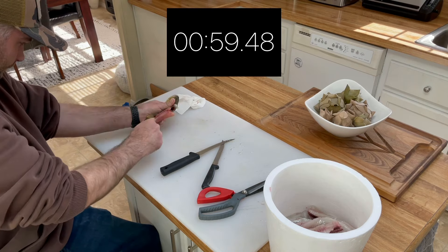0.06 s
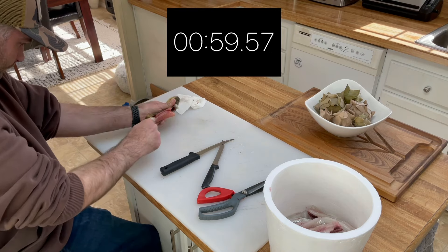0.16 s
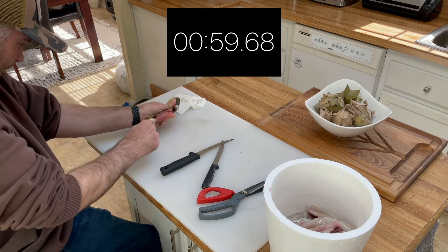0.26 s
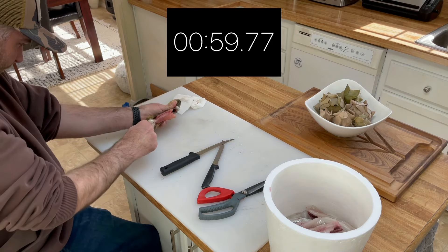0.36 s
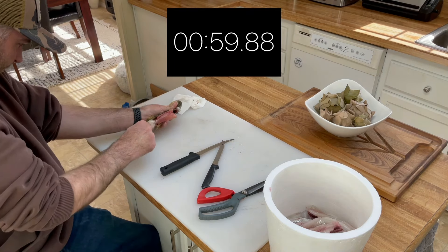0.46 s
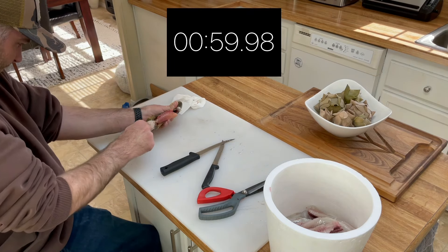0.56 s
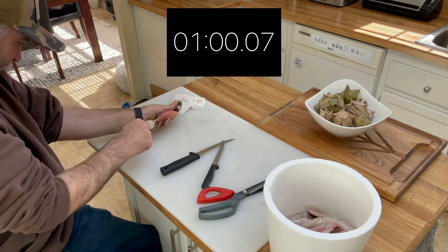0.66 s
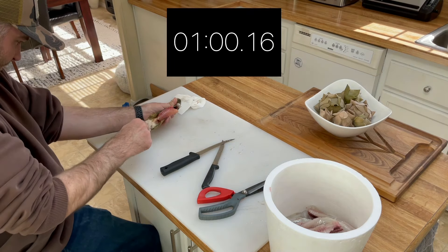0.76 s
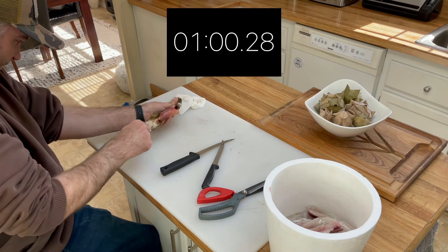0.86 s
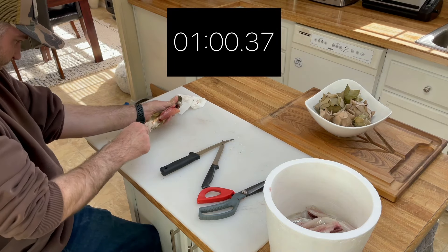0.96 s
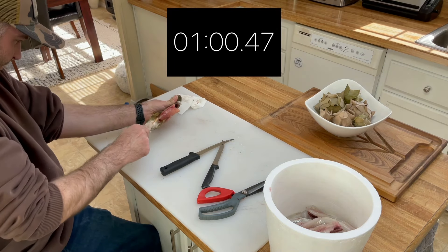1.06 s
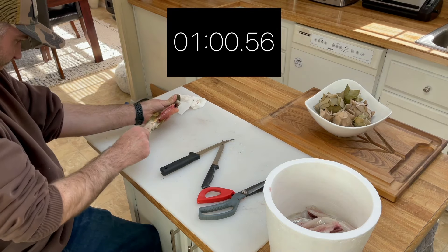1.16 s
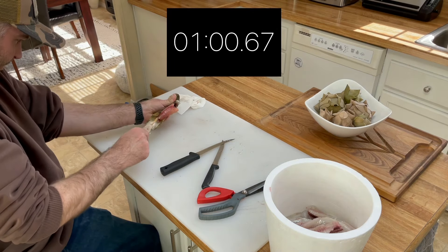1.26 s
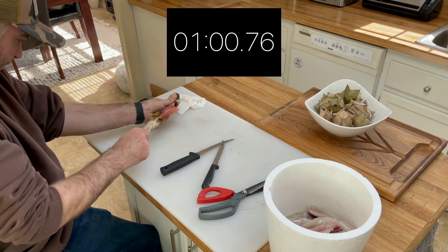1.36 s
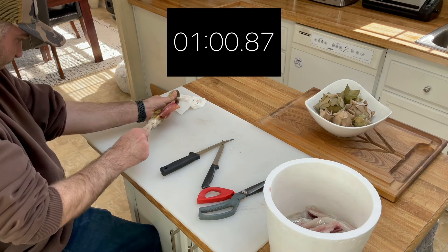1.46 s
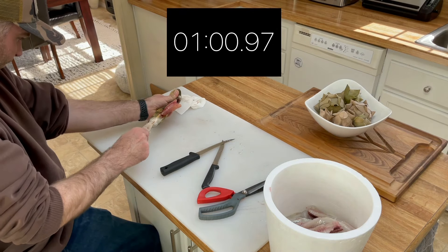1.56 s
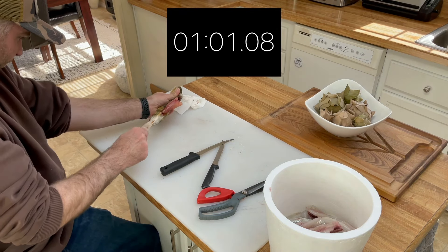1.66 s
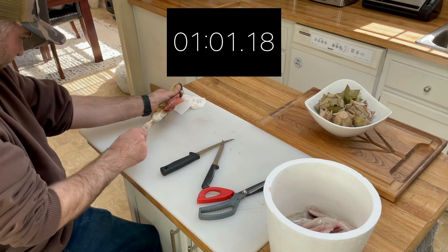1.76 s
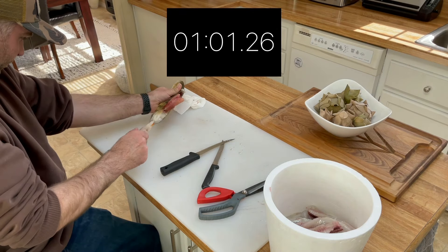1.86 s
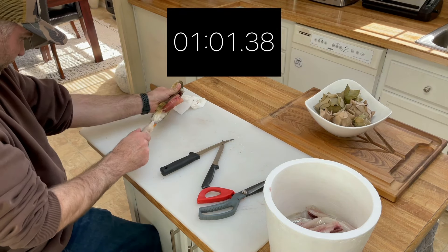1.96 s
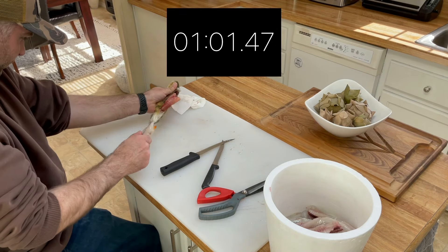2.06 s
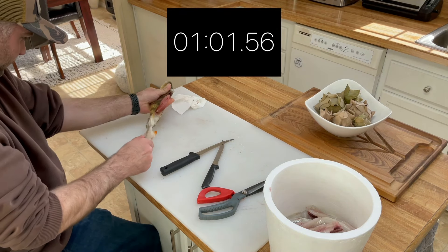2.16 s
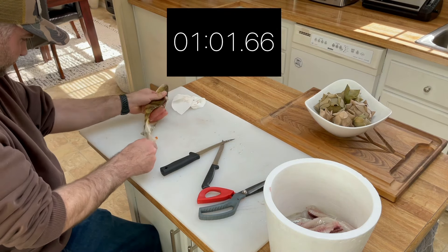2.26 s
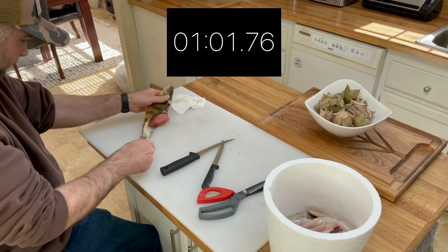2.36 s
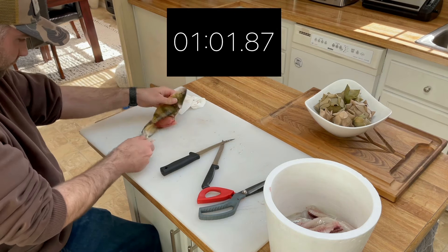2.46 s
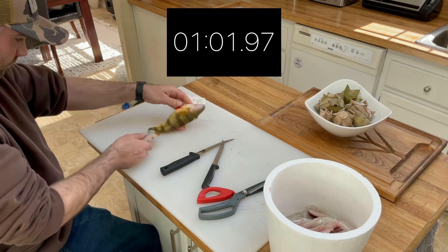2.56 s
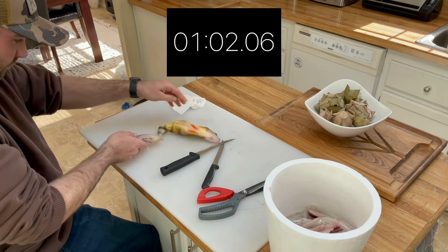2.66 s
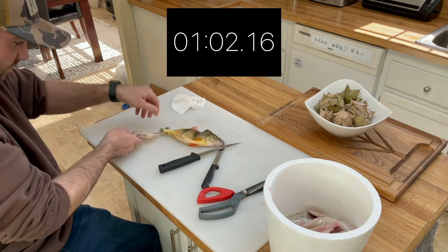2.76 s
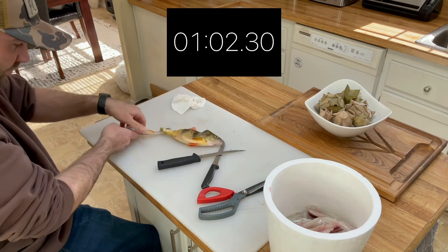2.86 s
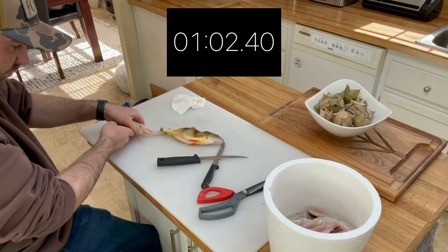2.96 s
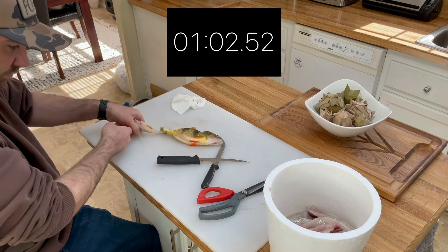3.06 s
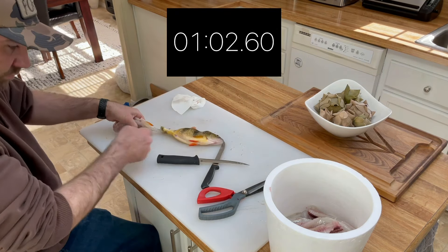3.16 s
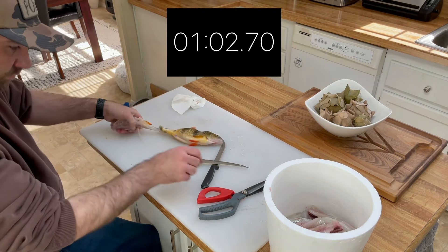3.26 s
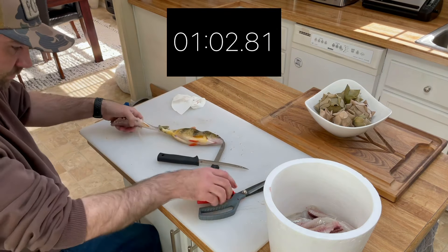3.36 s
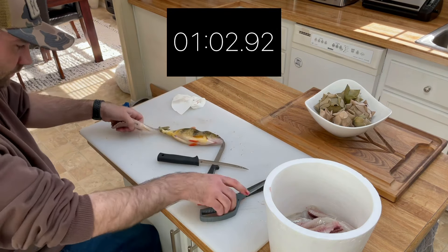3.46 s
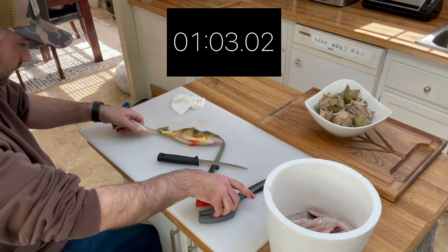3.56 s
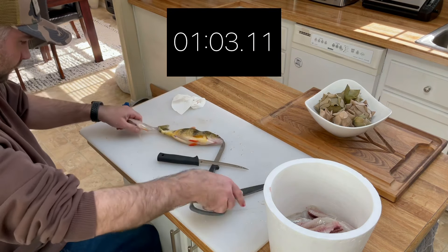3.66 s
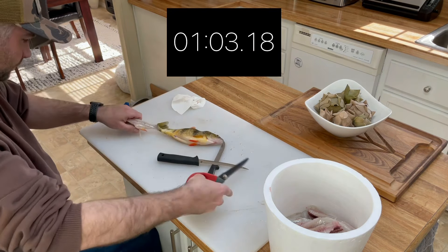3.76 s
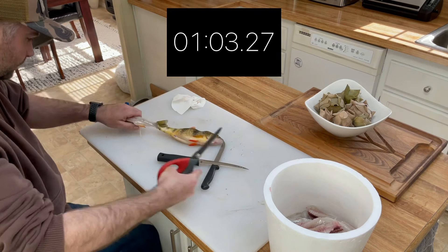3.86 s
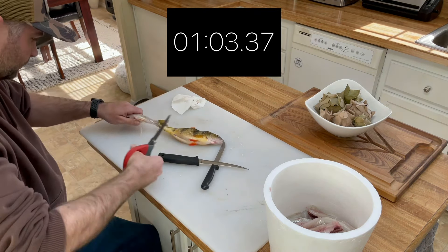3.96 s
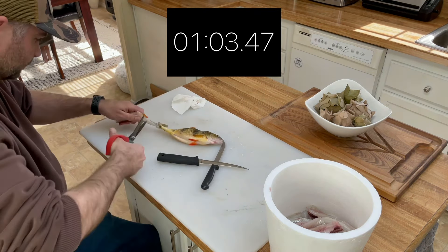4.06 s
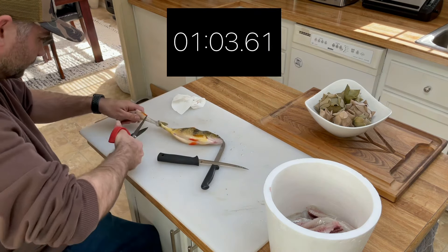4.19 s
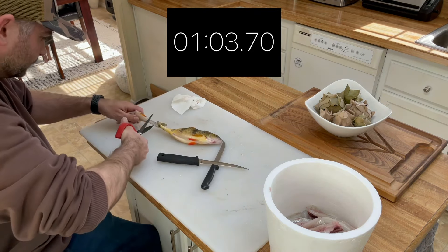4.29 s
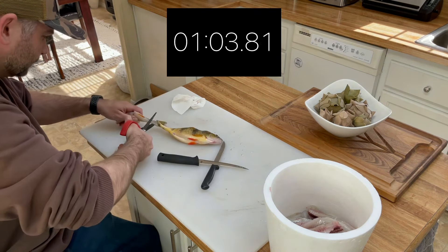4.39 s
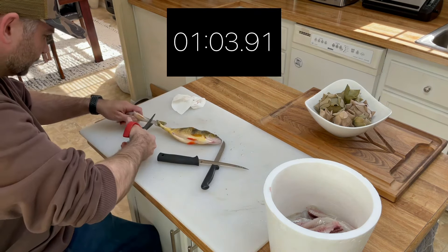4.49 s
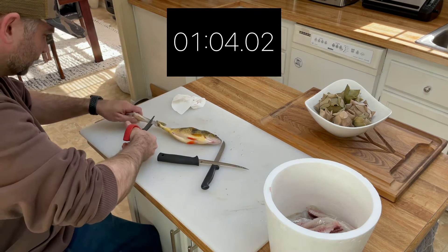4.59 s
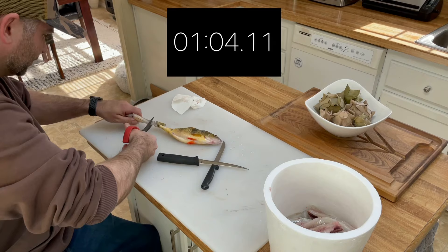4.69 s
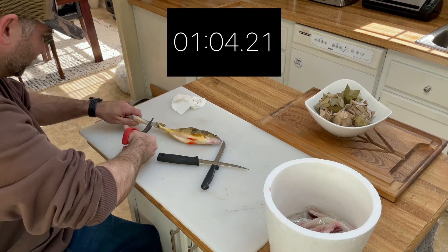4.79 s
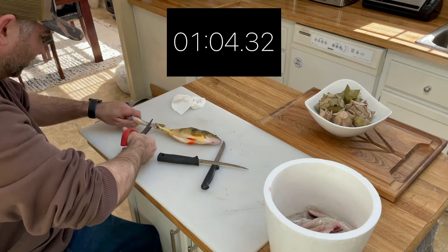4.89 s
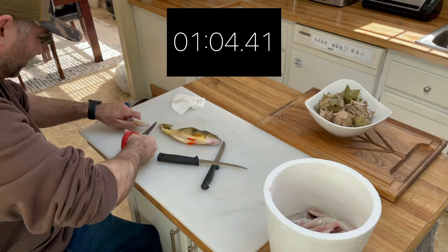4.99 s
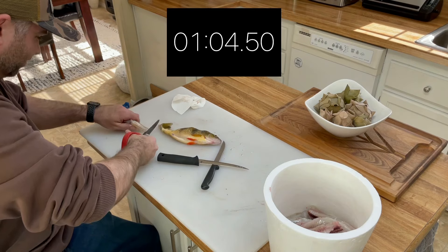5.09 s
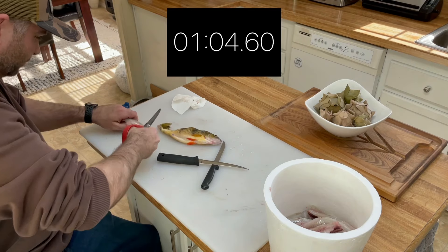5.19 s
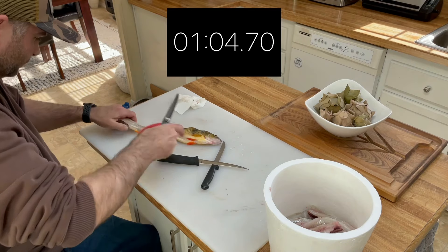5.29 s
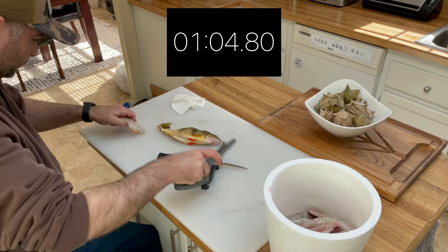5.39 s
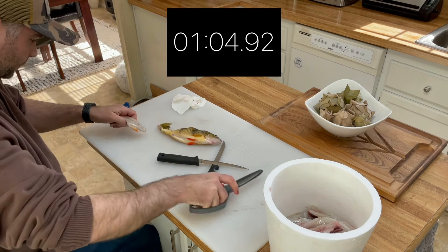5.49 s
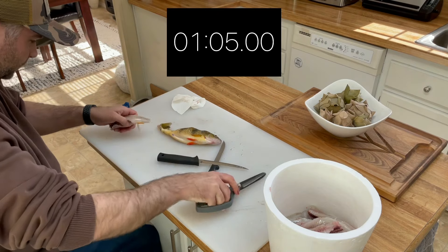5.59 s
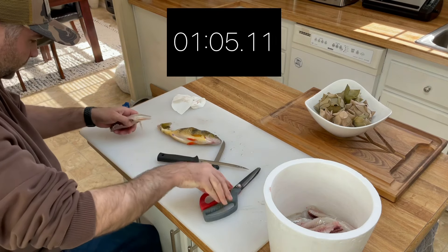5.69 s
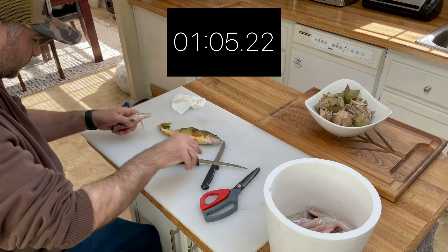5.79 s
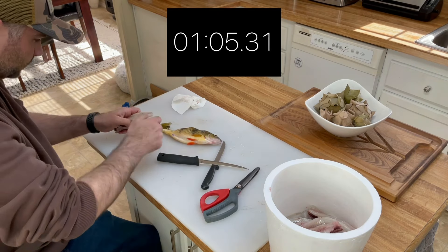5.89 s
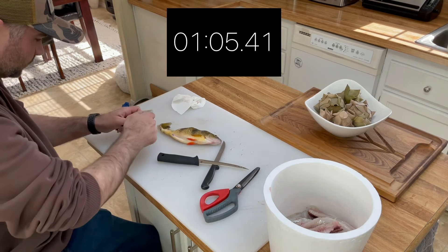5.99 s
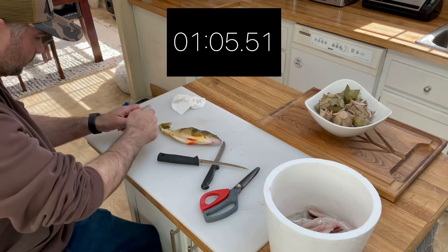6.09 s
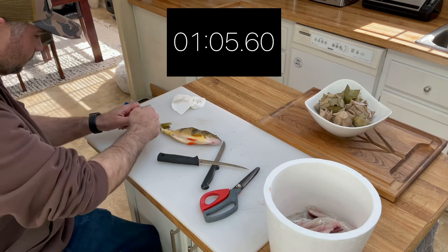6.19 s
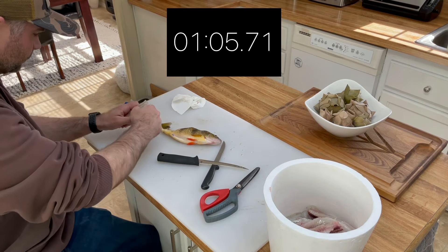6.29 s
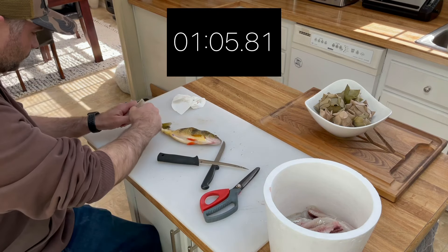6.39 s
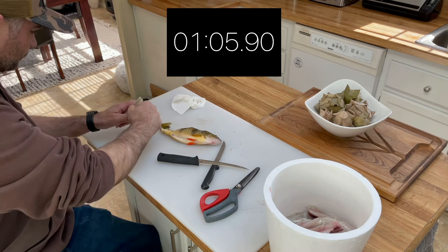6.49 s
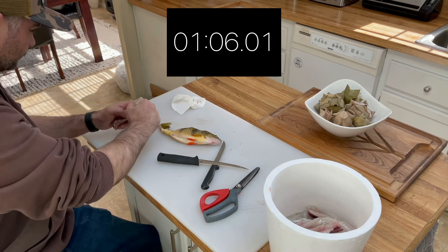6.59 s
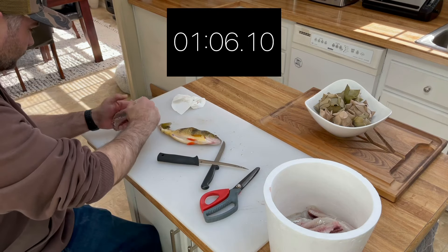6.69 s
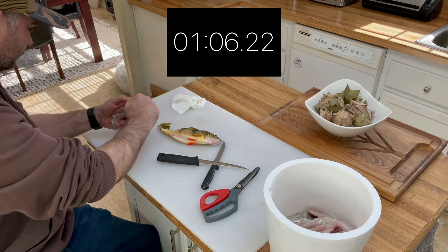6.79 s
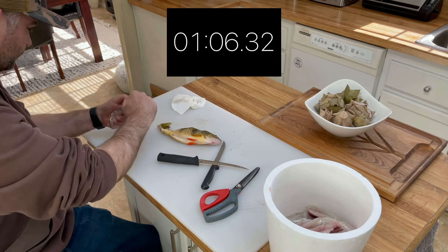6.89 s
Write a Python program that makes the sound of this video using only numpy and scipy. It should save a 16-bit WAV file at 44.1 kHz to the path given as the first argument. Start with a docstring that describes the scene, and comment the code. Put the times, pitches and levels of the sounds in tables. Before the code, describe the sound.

Wet fish flesh tears with sticky crackles, slaps onto a plastic board, then kitchen shears scrape, snip and clatter down hard in a small kitchen.

```python
"""Wet fish torn by hand, shears on a board

Hands tear and peel a wet fish, drop it on a plastic board, then pick up kitchen shears, snip and toss them down.
Flesh is crackle and hiss under stroke gains, with single ticks; board, counter and shears are damped modes
struck with a click. Drags, a soft groan and a faint squeak lie under the handling. Two noise echo tails make
a small hard kitchen over a quiet hush, taken by a phone with two microphone ports."""
import sys
import numpy as np
from scipy import signal
from scipy.fft import rfft, irfft
from scipy.io import wavfile
from scipy.ndimage import uniform_filter1d

SR = 44100
rng = np.random.default_rng(int(sys.argv[2]) if len(sys.argv) > 2 else 0)


def wav_out(sig):
    """Save sig, one row per channel (or a flat mono array), as 16-bit PCM at SR to the path in sys.argv[1]."""
    wavfile.write(sys.argv[1], SR, np.round(np.clip(np.atleast_2d(sig).T, -1, 1) * 32767).astype(np.int16))


N = 305986


def tearing():
    """Fibres and wet film snap in an uneven crackle over hiss; pockets of flesh squelch lower down."""
    # pulls and rubs on the wet fish: start_s, length_s, level_db, swell_to_end_db, squelch_db, hiss_db
    pulls = [(0, 0.073, -48, -10.5, 0.5, 9), (0.128, 0.2, -60, 6.5, -7.5, 7.5),
             (0.364, 0.024, -36.5, -12.5, -8, 7), (0.402, 0.26, -46, 4.5, -8, 6),
             (0.731, 0.065, -47, -0.5, -10.5, 9.5), (0.805, 0.039, -40, -7.5, -8.5, 10.5),
             (1.023, 0.067, -63.5, 14.5, -11, 7.5), (1.093, 0.21, -46.5, -16, -17, 3.5),
             (1.222, 0.056, -45, -6, -13, -1), (1.288, 0.12, -37, -3.5, -18, -1),
             (1.47, 0.2, -42, 2.5, -20, 0.5), (1.6, 0.059, -36, 3, -8, -3.5),
             (1.925, 0.035, -64.5, -5, -11, 9), (2.081, 0.17, -73.5, 5, 3, 7.5),
             (2.273, 0.18, -71.5, 14, 0.5, 8), (2.464, 0.1, -71, 12, 8.5, 6),
             (2.537, 0.1, -52, -7.5, 7.5, 7.5), (2.759, 0.034, -66.5, -11, 17, 13),
             (3.057, 0.077, -72, -5, 0, 9), (2.839, 0.011, -66.5, -4, -8, 10),
             (3.768, 0.073, -65.5, 5, -21, 11.5), (3.876, 0.12, -61.5, -1, -2.5, 4.5),
             (4.06, .14, -66.5, 0, -7, 8.5), (4.272, 0.1, -66, 3, -3, 8.5),
             (4.419, 0.085, -68, 1, -8.5, 10), (4.564, 0.045, -77.5, -1.5, -4, 13.5),
             (5.204, .1, -83, -0.5, -1.5, 13), (5.38, 0.035, -75, 6.5, -15, 13),
             (5.969, 0.1, -84, -7, 7, 16), (6.103, .18, -96, -10, 0, 16), (6.295, 0.028, -86, -2, -10, 26),
             (6.409, .03, -82.5, -2.5, -10, 19), (6.649, .02, -77, -9, -9.5, 17),
             (6.7, .24, -94.5, 9.5, -9, 18.5)]
    # single wet ticks: start_s, peak_db, lowest_hz, highest_hz
    ticks = [(0.317, -26.5, 1500, 12000), (0.365, -26, 910, 12400), (0.367, -25, 4000, 12200),
             (.381, -19, 970, 8900), (.384, -30, 1050, 1530), (.461, -22, 2500, 15000),
             (.494, -20.5, 920, 8000), (0.54, -14, 6000, 14400), (0.645, -26, 5400, 9400),
             (.738, -33, 3130, 14000), (0.752, -21, 4000, 13900), (0.8047, -8.5, 3700, 15000),
             (0.982, -36.5, 5300, 14100), (1.102, -32.5, 1980, 7000), (1.229, -38.5, 895, 6000),
             (1.2928, -16.5, 1020, 12700), (1.304, -26, 3000, 14100), (1.333, -33.5, 800, 2000),
             (1.369, -25, 1000, 5460), (1.4906, -30, 1500, 6500), (1.539, -30.5, 910, 5000),
             (1.939, -40.5, 4130, 11700), (2.211, -48, 895, 3000), (3.321, -42, 1480, 4470),
             (3.348, -46.5, 1800, 4800), (3.802, -45.5, 4050, 11940), (4.503, -44.5, 3000, 14070),
             (4.567, -50.5, 2980, 14000), (4.685, -47, 4000, 13000), (4.746, -40.5, 3030, 14300),
             (4.782, -46.5, 6000, 11100), (6.311, -34.5, 9000, 15080), (6.418, -42.5, 6490, 13980)]
    # spectrum of the tearing body: freq_hz, level_db
    body_colour = [(1500, -16.5), (2100, -15), (2600, -3.5), (3100, -1.5), (3650, -1), (4200, -2),
                   (4700, 2), (5250, 2.5), (5900, -1.5), (6600, -0.5), (7500, -1.5), (9000, -23)]
    # spectrum of the fine hiss: freq_hz, level_db
    hiss_colour = [(6000, -21), (7500, -1.5), (8500, -12), (10500, -4), (12500, -0.5), (14000, 2.5),
                   (16000, -6.5)]

    def snaps_and_noise(snaps_per_s, crackle_share=0.6):
        snaps = crackle(snaps_per_s, 1.7)
        return np.sqrt(crackle_share) * snaps + np.sqrt(1 - crackle_share) * rng.standard_normal(N)

    # each layer snaps at its own moments
    low = band(band(snaps_and_noise(250), 580, 1900), 610, 3400)
    squelch = unit(patchy(low, 620, count=7) * flicker(40, 3.0))
    mid = band(colour(snaps_and_noise(600), body_colour), 1800, 11000)
    body = unit(patchy(mid, 1500, count=9) * flicker(90, 2.0))
    hiss = unit(colour(snaps_and_noise(900), hiss_colour) * flicker(90, 5.0))

    gains = strokes(pulls, attack_s=0.006, fade_db_per_s=450.5)
    squelch_db, hiss_db = np.transpose(pulls)[-2:]
    out = summed(gains) * body + summed(gains, squelch_db) * squelch + summed(gains, hiss_db) * hiss

    # the skin lets go in a quick even run of snaps
    run_start_s, run_step_s, run_snaps = 1.605, 0.008, 8
    run = [(run_start_s + k * run_step_s, -20, 2820, 6000) for k in range(run_snaps)]
    for start_s, peak_db, lo_hz, hi_hz in [*ticks, *run]:
        add(out, start_s, undb(peak_db) * crack(lo_hz, hi_hz, 0.0018, -11.5, order=3))
    return out


def knocks():
    """Each blow thuds in the counter, rings the board and cracks at the contact."""
    # blows on board and counter: start_s, thud_db, board_ring_db, board_focus_hz, crack_db, crack_top_hz
    blows = [(2.539, -46, -30, 890, -31.5, 6000), (2.551, -26, -21, 753, -28, 4430),
             (2.556, -36.5, -16.5, 800, -25.5, 3000), (2.568, -41.5, -23, 790, -36, 3000),
             (2.580, -43, -24.5, 800, -34, 3500), (2.619, -48.5, -37.5, 850, -39, 3000),
             (2.750, -60, -62, 1700, -54, 2500), (2.766, -49, -48, 1500, -41, 5570),
             (2.771, -42, -47, 1300, -39, 3000), (2.787, -44.5, -48, 1300, -50, 3000),
             (2.846, -47, -41.5, 660, -62, 3000), (2.866, -50, -53, 800, -65, 3000),
             (3.329, -30.5, -31.5, 601, -37.5, 3010), (3.41, -30.5, -30, 525, -38, 4000),
             (3.429, -35, -25, 700, -40, 4510), (3.447, -26.5, -24.5, 725, -43, 3520),
             (3.458, -33.5, -26.5, 600, -45, 3540), (3.470, -25.5, -21, 466, -31.5, 4000),
             (3.487, -32.5, -29.5, 912, -34, 3500), (3.512, -34.5, -32.5, 900, -34, 2972),
             (3.563, -30, -19.5, 1815, -7.5, 3500), (3.578, -38.5, -24, 1750, -29, 2990),
             (3.590, -38, -29.5, 594, -42, 3000), (4.771, -30, -24.5, 433, -42.5, 2994),
             (4.787, -27, -25.5, 514.4, -60, 3020), (4.855, -34, -28.5, 700, -29, 6000),
             (4.866, -24.5, -15.5, 994, -18.5, 4000), (4.883, -35.5, -20.5, 1000, -26.5, 3050),
             (4.950, -26, -23.5, 443.5, -38.5, 2980), (5.444, -13.5, -8.5, 766.3, -12, 3900),
             (5.454, -18.5, -13.5, 900, -19, 2990), (5.462, -20, -13, 1376, -19.5, 4010),
             (5.490, -23.5, -22, 500, -29.5, 3014), (5.53, -20.5, -11, 719, -15.5, 6750),
             (5.555, -19.5, 1.5, 1600, -4, 5030), (5.560, -19.5, -6, 560, -21, 2985),
             (5.570, -23.5, -2.5, 1450, -11, 4000), (5.583, -26.5, -4.5, 1400, -18.5, 4000),
             (5.599, -8, 0, 648.5, -4, 3746), (5.611, -9, -2, 620, -22.5, 3544),
             (5.627, -14.5, -5, 672, -13, 3504)]
    # counter modes: freq_hz, level_db
    counter_modes = [(57, -7), (70, -8.5), (86, 1.5), (110, -7), (134, -4), (151, -1), (180, -6), (211, 0),
                     (250, -3.5), (290, -3), (312, -3.5), (360, -8)]
    # plastic board modes: freq_hz, level_db
    board_modes = [(420, 1.5), (500, -1.5), (570, -7), (630, -2), (722, 1), (800, -1.5), (870, -5.5),
                   (946, -6.5), (1060, 0.5), (1150, -0.5), (1257, -1.5), (1366, 4), (1467, 1), (1586, 0),
                   (1681, 0), (1800, -1)]
    out = np.zeros(N)
    for start_s, thud_db, board_db, focus_hz, crack_db, top_hz in blows:
        thud = ring(counter_modes, envelope_t60_s=0.18, rise_s=0.003)
        board = ring(board_modes, 0.04, 0.0005, focus_hz, 0.79)
        add(out, start_s, undb(thud_db) * thud)
        add(out, start_s, undb(board_db) * board)
        add(out, start_s, undb(crack_db) * crack(1300, top_hz, 0.0032, -12.5, order=2))
    return band(out, 41, 18000)


def shears():
    """Steel and plastic clack together as damped modes, each with a click at the contact."""
    # blades or handles meeting: start_s, ring_db, focus_hz, breadth_octaves, crack_db, crack_top_hz
    clacks = [(3.262, -47, 3210, 0.18, -60, 6000), (3.346, -44.5, 3005, .7, -45.5, 5000),
              (3.428, -38, 3300, .7, -47.5, 5000), (3.479, -38.5, 3400, .3, -50, 5000),
              (3.528, -36.5, 2200, .4, -46, 4000), (3.537, -34, 2693, .4, -42.5, 4000),
              (3.550, -35, 2300, .4, -38.5, 4000), (3.563, -10.5, 1995, 0.7, -5.5, 4880),
              (3.578, -23.5, 2010, .5, -29, 4000), (3.895, -46, 2116, .5, -41, 6000),
              (3.931, -36, 2040, .5, -31.5, 8100), (4.861, -18.5, 4460, 1.4, -20, 10000),
              (4.866, -1, 3500, 1.6, 5.5, 12150), (4.869, -4, 2200, 0.66, 1, 11000),
              (4.875, 6.5, 4700, 1.0, 4, 10960), (4.884, -5.5, 2200, .5, -0.5, 10000),
              (4.901, -8.5, 2260, .5, -6.5, 9000), (4.917, -5.5, 4500, .8, -10, 8000),
              (4.935, -15, 2190, .5, -14.5, 8000), (5.444, -15, 3100, 0.53, -14.5, 8830),
              (5.529, -19.5, 2472, 1.0, -22, 10070), (5.555, 0.5, 2997, 0.63, 2.5, 8000),
              (5.599, -5, 2180, 1.0, -19, 7000)]
    # shears modes: freq_hz, level_db
    shears_modes = [(1800, -17.5), (1915, -10), (1985, -3.5), (2080, -4), (2186, 2), (2310, -5.5),
                    (2483, -1.5), (2719, -14.5), (2966, -5.5), (3400, -5), (3900, -10.5), (4300, -5),
                    (4533, -8), (4775, -3), (5200, -9), (5545, -2), (5900, -6.5), (6206, -2.5),
                    (6519, -4.5), (7628, -17), (8500, -2.5), (9302, -4.5), (10490, -13)]
    out = np.zeros(N)
    for start_s, ring_db, focus_hz, octaves, crack_db, top_hz in clacks:
        clack = ring(shears_modes, 0.023, 0.00011, focus_hz, max(octaves, 0.2))
        add(out, start_s, undb(ring_db) * clack)
        add(out, start_s, undb(crack_db) * crack(1700, top_hz, 0.0037, -11.0, order=1))
    return out


def dragging():
    """Dense stick-slip bumps shake the counter and scuff the board."""
    # shears and fish dragged over the board: start_s, length_s, rumble_db, swell_to_end_db, scuff_re_rumble_db
    drags = [(2.783, 0.037, -46.5, -10, -16), (2.944, 0.028, -60, -1.5, -17), (3.031, 0.017, -66.5, 3, -32),
             (3.323, 0.051, -44, 1, -7.5), (3.429, 0.063, -42.5, 4, -1.5), (3.506, 0.061, -46, 6.5, -1.5),
             (4.789, 0.1, -43, 2.5, -27), (5.416, .028, -55.5, 9, -1.5)]
    gains = strokes(drags, attack_s=0.0027, fade_db_per_s=901.5)
    bumps = crackle(4000, 1.7) * flicker(45, 2.8)
    rumble = unit(band(band(bumps, 65, 730), 45, 1000))
    scuff = unit(band(band(bumps, 750, 2400), 700, 3500))
    scuff_db = np.transpose(drags)[-1]
    return summed(gains) * rumble + summed(gains, scuff_db) * scuff


def groan():
    """Snaps in a narrow band near 1.1 kHz groan under the handling, perhaps the hinge or rubbed board."""
    # soft groans: start_s, length_s, level_db, swell_to_end_db
    groans = [(2.391, 0.067, -64, 8), (2.491, .041, -68, 6), (3.791, 0.024, -65.5, 1),
              (3.911, 0.1, -62.5, -7), (4.081, 0.097, -72.5, 10.5), (4.286, 0.085, -60.5, 0.5)]
    gains = strokes(groans, attack_s=0.01, fade_db_per_s=250)
    return summed(gains) * unit(band(crackle(400, 3.3), 1000, 1180))


def squeak():
    """A few thin upper partials of one gliding pitch move together and fall away."""
    # glide of the faint squeak: time_s, eighth_partial_hz
    glide = [(5.79, 11970), (5.86, 11680), (5.91, 12360), (5.95, 12600), (5.98, 12240), (6.015, 11100),
             (6.07, 10960), (6.11, 10120), (6.17, 8500)]
    # partials heard: multiple_of_fundamental, level_db
    partials = [(5, -89), (7, -71.5), (8, -68), (9, -76.5)]
    time_s, eighth_hz = np.transpose(glide)
    t = np.arange(N) / SR
    fundamental_hz = uniform_filter1d(np.interp(t, time_s, eighth_hz), 900) / 8
    phase = 2 * np.pi * np.cumsum(fundamental_hz) / SR
    on = np.clip(np.minimum(t - time_s[0], time_s[-1] - t) / 0.035, 0, 1)
    return on * sum(undb(db) * np.sin(k * phase) for k, db in partials)


def room():
    """Two unrelated echo tails, each octave with its own level and decay after a short gap."""
    # kitchen echo: freq_hz, t60_s, level_db
    echo = [(100, 0.48, -1.5), (397, 0.34, -3), (1500, 0.33, -1.5), (4000, 0.32, 0), (9000, 0.18, 1.5),
            (15000, 0.25, 1)]
    hz, t60_s, level_db = np.transpose(echo)
    t = np.arange(int(0.6 * SR)) / SR
    tail = np.zeros((2, len(t)))
    for centre_hz in 60 * 2.0 ** np.arange(9):
        octave_t60_s = np.interp(np.log(centre_hz), np.log(hz), t60_s)
        octave_db = np.interp(np.log(centre_hz), np.log(hz), level_db)
        noise = band(rng.standard_normal((2, len(t))), centre_hz / np.sqrt(2), centre_hz * np.sqrt(2))
        tail += undb(octave_db) * noise * 1000.0 ** (-t / octave_t60_s)
    tail *= np.clip((t - 0.002) / 0.0022, 0, 1)
    return tail / np.sqrt(np.sum(tail ** 2, axis=1, keepdims=True))


def house_hush():
    """Two unrelated steady noises, strongest in the bass, for the hush of the house."""
    # hush spectrum: freq_hz, relative_density_db
    hush_colour = [(15, -40), (25, -14.5), (58, 2.5), (85, -4), (190, -11.5), (312, -13), (385, -17),
                   (476, -16), (922, -23.5), (3220, -33), (7000, -34), (9000, -37.5), (11000, -27),
                   (13000, -29.5), (14500, -52)]
    pair = [colour(rng.standard_normal(N), hush_colour) for _ in range(2)]
    return undb(-58) * np.array(pair)


def ring(modes, envelope_t60_s, rise_s, focus_hz=1000, octaves=20):
    """Damped modes after one blow; those near the focus are favoured, high ones die sooner; peak 1."""
    hz, db = np.transpose(modes)[:, :, None]
    t = np.arange(int(1.5 * envelope_t60_s * SR)) / SR
    level_chance, pitch_chance, sign_chance = rng.standard_normal((3, len(modes), 1))
    focus_db = -14 * (np.log2(hz / focus_hz) / octaves) ** 2
    gain = undb(db + focus_db + 2.0 * level_chance) * np.sign(sign_chance)
    tones = np.sin(2 * np.pi * hz * (1 + 0.012 * pitch_chance) * t)
    x = np.sum(gain * tones * np.exp(-t * hz / 40), axis=0)
    x = x * 1000.0 ** (-t / envelope_t60_s) * (1 - np.exp(-t / rise_s))
    return x / np.abs(x).max()


def crack(lo_hz, hi_hz, decay_s, grit_db, order):
    """A sharp click at the contact with evenly coloured grit after it; peak 1."""
    t = np.arange(SR // 20) / SR
    grit = undb(grit_db) * rng.standard_normal(len(t)) * np.exp(-t / decay_s)
    burst = rfft((t == 0) + grit)
    flat = burst / uniform_filter1d(np.abs(burst), size=9)
    x = irfft(flat, len(t)) * np.exp(-t / (3 * decay_s))
    x = signal.sosfilt(signal.butter(max(order, 2), lo_hz, "high", fs=SR, output="sos"), x)
    x = signal.sosfilt(signal.butter(order, hi_hz, fs=SR, output="sos"), x)
    return x / np.abs(x).max()


def crackle(snaps_per_s, spread_db):
    """Random one-sample snaps, a few much larger than the rest."""
    when, sign, size = rng.random((N, 3)).T
    snap = undb(-spread_db * np.log(size + 0.0027)) * np.sign(sign - 0.5)
    return unit((when < snaps_per_s / SR) * snap)


def patchy(x, lo_hz, count):
    """Narrow bands swell and sink on their own, as pockets in the flesh open and close."""
    edges_hz = lo_hz * 2 ** (0.3 * np.arange(count + 1))  # 0.3 octave each
    return x + sum(band(x, lo, hi) * (flicker(45, 1.75) - 1) for lo, hi in zip(edges_hz, edges_hz[1:]))


def flicker(steps_per_s, spread_db):
    """A random gain stepping at the given rate, its steps smoothed over half a step."""
    k = int(SR / steps_per_s)
    steps = np.repeat(rng.standard_normal(N // k + 1), k)
    return undb(spread_db * uniform_filter1d(steps, k // 2)[:N])


def strokes(rows, attack_s, fade_db_per_s):
    """One gain curve a row: a short attack, a steady swell or sag, then a fade."""
    start_s, length_s, level_db, swell_db = np.transpose([r[:4] for r in rows])[:, :, None]
    t = np.arange(N) / SR - start_s
    shape_db = swell_db * np.clip(t / length_s, 0, 1) - fade_db_per_s * np.clip(t - length_s, 0, 1)
    return undb(level_db + shape_db) * np.clip(t / attack_s, 0, 1)


def summed(gains, db=0):
    """Strokes added by power, each raised by its own dB."""
    return np.sqrt(np.sum((gains * undb(db).reshape(-1, 1)) ** 2, axis=0))


def undb(db):
    """Amplitude ratio from dB."""
    return 10 ** (np.asarray(db) / 20)


def unit(x):
    """Scale to RMS 1."""
    return x / np.sqrt(np.mean(x ** 2))


def across(table, n):
    """A (Hz, value) table read at the bins of an n-point spectrum."""
    hz, value = np.transpose(table)
    bins_hz = np.arange(n // 2 + 1) * SR / n
    return np.interp(np.log(bins_hz + 1), np.log(hz), value)


def colour(x, table):
    """Shape a spectrum by (Hz, dB) points; RMS 1."""
    return unit(irfft(rfft(x) * undb(across(table, N)), N))


def band(x, lo_hz, hi_hz):
    """Second-order Butterworth band-pass."""
    sos = signal.butter(2, [lo_hz, min(hi_hz, 0.45 * SR)], "band", fs=SR, output="sos")
    return signal.sosfilt(sos, x)


def add(out, start_s, x):
    """Mix x into out at start_s, cut at the end."""
    i = int(start_s * SR)
    out[i:i + len(x)] += x[:N - i]


def scene():
    """Sources, their echoes and the hush, as the common and the differing field at the phone."""
    dry = tearing() + knocks() + shears() + dragging() + groan() + squeak()
    wet = signal.fftconvolve(dry[None], room(), axes=1)[:, :N]
    return undb(4.0) * dry + undb(1.0) * wet + house_hush()


def record(dry):
    """Microphone colour, ports in or out of step by frequency, left a shade louder; overload; the top is cut."""
    # phase by which the left port leads the right: freq_hz, lead_rad
    port_lead = [(60, 0.22), (290, .65), (640, 1.3), (2000, 1.1), (5000, 1.534), (6500, 1.5), (7800, 2.85),
                 (8600, 2.9), (9500, 3.73), (10700, 4.48), (11800, 4.8), (12800, 6.2)]
    # microphone response: freq_hz, level_db
    mic_colour = [(30, 1), (60, 0.5), (6000, 1), (8500, 4), (11000, 3), (13300, -0.5), (14200, -8.5),
                  (16000, -7)]
    lead_rad, mic = across(port_lead, N), undb(across(mic_colour, N))
    mid = irfft(rfft(dry[0]) * mic * np.cos(lead_rad / 2), N)
    # a quarter turn: left leads, right lags
    side = irfft(rfft(dry[1]) * mic * np.sin(lead_rad / 2) * 1j, N)
    pair = np.array([undb(-2.0) * (mid + side), undb(-3.0) * (mid - side)])
    overloaded = np.clip(pair, -1, 1)
    top_cut = signal.ellip(8, 0.2, 60, 15580, fs=SR, output="sos")  # ripple and stop dB, edge Hz
    return signal.sosfilt(top_cut, overloaded)


dry = scene()
out = record(dry)
wav_out(out)
```